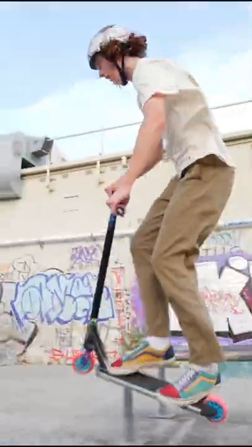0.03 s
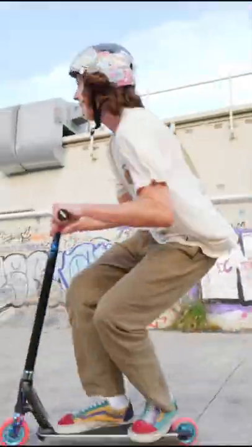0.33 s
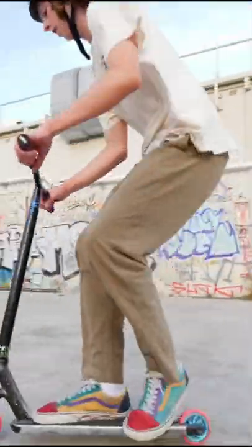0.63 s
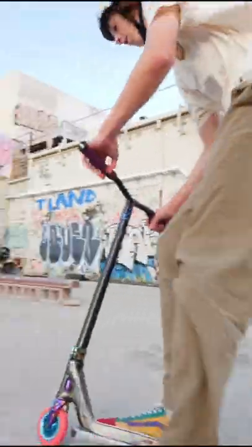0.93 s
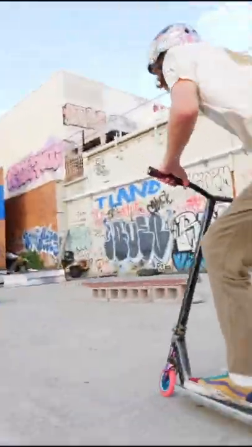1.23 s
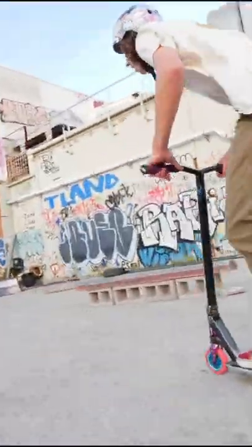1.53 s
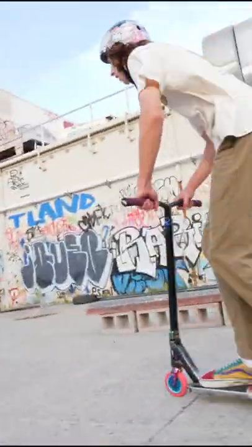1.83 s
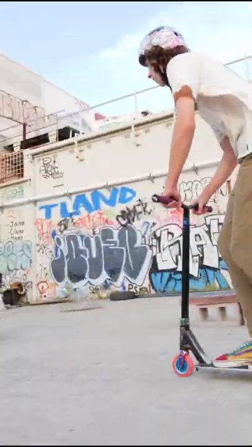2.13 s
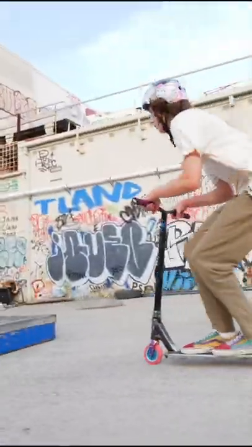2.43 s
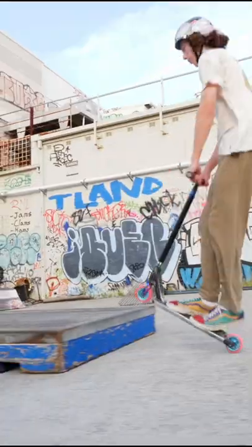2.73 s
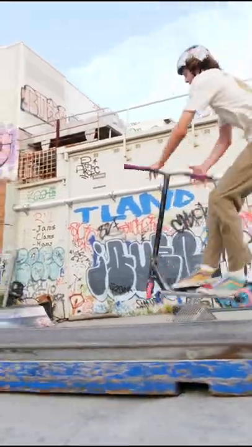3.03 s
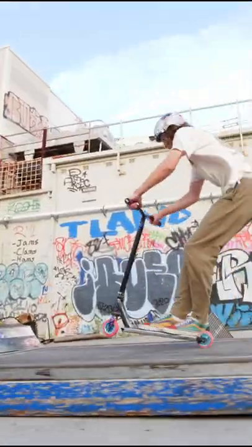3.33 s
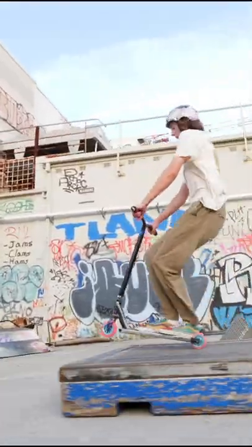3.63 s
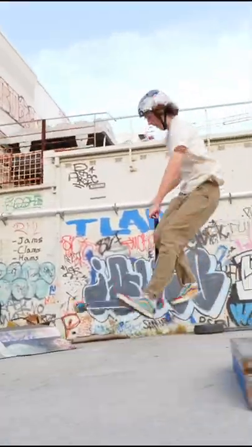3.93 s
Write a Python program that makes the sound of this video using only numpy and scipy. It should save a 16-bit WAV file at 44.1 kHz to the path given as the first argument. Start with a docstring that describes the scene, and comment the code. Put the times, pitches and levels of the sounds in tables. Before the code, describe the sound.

Hard scooter wheels land off a ringing rail and roar by on rough skatepark concrete, loose metal rattling. The scooter then thumps onto a wooden box and scrapes off its edge, while wind rumbles on the close microphone.

```python
"""Skatepark, one moving microphone, air buffeting it throughout and a wall answering the knocks faintly.
A steel rail is ringing as a stunt scooter leaves it and clacks onto concrete at 0.2 s. The hard wheels
roar and whine nearer, pass close by the microphone at about 1.1 s in a hiss of crushed grit, and roll
on over rough ground, loose metal rattling. At 3.1 s the scooter hops onto a hollow wooden box, which
booms and then drums under the wheels; at 3.8 s the deck scrapes off its edge."""
import sys
import numpy as np
from scipy import signal
from scipy.fft import rfft, irfft, next_fast_len
from scipy.io import wavfile
from scipy.ndimage import uniform_filter1d, map_coordinates

SR = 44100
rng = np.random.default_rng(int(sys.argv[2]) if len(sys.argv) > 2 else 0)


def master_out(mix):
    """Clip the mix to full scale and print it as 16-bit PCM to the path in sys.argv[1]."""
    frames = np.transpose(np.atleast_2d(mix))
    ceiling = np.clip(frames, -1, 1)
    pcm = np.round(ceiling * 32767).astype(np.int16)
    wavfile.write(sys.argv[1], SR, pcm)


N = 176400

# decay of the wall's answer: frequency_hz, t60_s
WALL_DECAY = [(150, 0.9), (1500, 0.059), (10000, 0.2)]
# gusts on the microphone: time_s, level_db
WIND_LEVELS = [(0, -17), (.15, -12), (.22, -19), (.38, -26.5), (.58, -23.5), (.74, -29), (.92, -13.5),
               (1.08, -20.5), (1.27, -12.5), (1.53, -7.5), (1.7, -15), (1.91, -8.5), (2.02, -13.5),
               (2.48, -19), (2.69, -10.5), (2.77, -16.5), (2.91, -9), (2.98, -17.5), (3.09, -7.5),
               (3.19, -19), (3.4, -13.5), (4, -16.5)]
# their rumble: frequency_hz, level_db
WIND_COLOUR = [(15, -1), (40, -4), (70, -9), (120, -16.5), (200, -24.5), (350, -36), (700, -72),
               (2000, -103)]
# modes of the steel rail: pitch_hz, level_db, t60_s
RAIL_MODES = [(1290, -49, .6), (1480, -44, .55), (2920, -53, .8), (3665, -47, 1.3), (3722, -31.5, .53),
              (3910, -42, .5), (10350, -53, .55)]
# noisy wash around those modes: frequency_hz, level_db
RAIL_COLOUR = [(500, -1), (1500, -2), (2200, -5.5), (3200, -5), (3950, -3), (4600, -7), (7000, -9),
               (8000, -18), (15000, -35)]
# sand bursting under the wheels: time_s, level_db
SAND_LEVELS = [(.15, -90), (.3, -60), (1.6, -80), (2.25, -78), (2.73, -55), (2.83, -76), (3.45, -66)]
# its crisp top: frequency_hz, level_db
SAND_COLOUR = [(4000, -30), (10500, -14), (12000, 2), (15000, 1), (16000, -11)]
# whine of the approaching wheels: time_s, pitch_hz, level_db
WHEEL_WHINE = [(.2, 2550, -59), (.4, 2720, -51), (.68, 2500, -54), (.83, 2080, -41), (1.0, 1550, -48)]
# hum of the deck passing close: time_s, pitch_hz, level_db
DECK_HUM = [(.62, 590, -52), (.8, 570, -37.5), (1.15, 555, -39), (1.4, 545, -52)]
# wheels on the ground: time_s, roar_db, hiss_db
ROLL_LEVELS = [(.18, -42, -65), (.23, -36.5, -48.5), (.5, -38.5, -51), (.74, -37, -45), (.8, -37.5, -39),
               (1.0, -33, -34), (1.07, -31.5, -40), (1.14, -32, -30.5), (1.24, -31.5, -35),
               (1.35, -35.5, -41.5), (1.5, -36.5, -54), (1.62, -43, -64), (1.85, -38.5, -55.5),
               (2.25, -40.5, -62), (2.68, -30.5, -53), (2.98, -39.5, -58), (3.25, -41, -71),
               (3.45, -38, -51), (3.75, -35.5, -82), (4, -40.5, -53)]
# roar of wheels on concrete: frequency_hz, level_db
ROAR_COLOUR = [(60, -13), (200, 0.5), (400, -0.5), (560, -1), (800, -7), (1100, -10.5), (1700, -12),
               (2600, -21), (4200, -29.5), (7000, -34), (11000, -45), (16000, -56)]
# hiss of grit crushed close by: frequency_hz, level_db
HISS_COLOUR = [(200, -25), (800, -2), (2000, 0.5), (2800, -1), (3900, -0.5), (5000, -3), (7100, -4),
               (8200, -9), (12000, -13.5), (15500, -20.5)]
# resonances of loose metal parts: pitch_hz, width_hz, level_db
METAL_MODES = [(1650, 100, 15), (4810, 110, 0), (5420, 140, -1), (5860, 110, -2), (6210, 110, 0),
               (8600, 400, -5)]
# brightness of their clicks: frequency_hz, level_db
METAL_COLOUR = [(500, -0.5), (1500, 2.5), (4200, 0), (6200, 3), (9500, -3), (11500, -15.5), (15500, -13.5)]
# bouts of one loose part chattering: start_s, level_db, t60_s
JINGLE_BOUTS = [(1.907, -36.5, .24), (2.085, -50, .55), (2.185, -52, .4), (2.312, -51, .3)]
# loose metal and grit snapping: start_s, level_db, t60_s
RATTLE_CLICKS = [(0.188, -23, 0.059), (.316, -33.5, 0.025), (1.1196, -27, 0.028), (1.2144, -20, 0.038),
                 (1.654, -37, 0.036), (2.676, -37, .033), (2.712, -25.5, 0.015), (2.8353, -41, 0.1),
                 (3.069, -40, 0.044), (3.0876, -22, 0.034), (3.4407, -37, 0.046), (3.822, -31, 0.03),
                 (3.865, -35.5, 0.066)]
# modes of the hollow box: pitch_hz, level_db, t60_s
BOX_MODES = [(124, -6, .2), (206, -3, .13), (247, 3.5, .14), (361, -2.5, .22), (400, -3.5, .14),
             (533, -11.5, .158), (709, -12, .15), (1310, -25, .23)]
# blows on the box: start_s, boom_db, clatter_db
BOX_BLOWS = [(3.14, -9, -18), (3.336, -31.5, -39), (3.8248, -19, -53), (3.843, -24, -60)]
# the box drumming under the wheels: time_s, level_db
DRUM_LEVELS = [(3.14, -60), (3.5, -60), (3.7, -41.5), (3.82, -32), (3.92, -87)]
# wood of the box clattering or scraped: frequency_hz, level_db
WOOD_COLOUR = [(200, 17), (700, 6), (1400, -5), (2100, 4), (2700, 0), (3300, -8), (4500, -28), (7000, -39),
               (15000, -55)]
# resonances of the scooter's frame and wheels: pitch_hz, width_hz, level_db
FRAME_MODES = [(264, 190, -2), (413, 145, 6.5), (765, 296, 0), (1115, 262, 3), (1663, 183, 0),
               (2330, 260, -9.5), (3800, 1150, -12.5), (7330, 3000, -20.5)]
# wheel blows: start_s, peak_db, hardness_hz, chatter_t60_s
WHEEL_BLOWS = [(.1904, 2, 5000, .02), (.1925, -10, 500, .03), (.1988, -9.5, 1000, .014),
               (.2162, -19, 4900, .03), (.2463, -20, 300, .037), (1.0235, -10, 1200, .012),
               (1.029, -6.5, 600, .029), (1.035, -5.5, 1000, .025), (1.209, -13, 4000, .054),
               (1.2162, -6.5, 8000, .045), (1.6547, -19.5, 8000, .08), (1.699, -28, 9000, .025),
               (2.047, -26, 1500, .07), (2.667, -22, 1000, .12), (3.1393, -8, 2000, .07),
               (3.166, -19, 1800, .06), (3.8095, -11, 3000, .06), (3.8165, -8, 1400, .05)]


def amp(db):
    """Decibels to gain."""
    return 10 ** (np.asarray(db) / 20)


def unit(x):
    """Scale to rms 1."""
    return x / np.sqrt(np.mean(x ** 2) + 1e-20)


def along(points, hz):
    """Interpolate (frequency_hz, value) rows on a log frequency axis."""
    knots_hz, values = np.transpose(points)
    return np.interp(np.log(hz + 1), np.log(knots_hz + 1), values)


def curves(rows, **ends):
    """One value per sample for each column after time_s."""
    time_s, *columns = np.transpose(rows)
    return [np.interp(np.arange(N) / SR, time_s, column, **ends) for column in columns]


def wobble(per_s):
    """A smooth random curve with per_s knots a second."""
    return map_coordinates(rng.standard_normal(4000), [np.arange(N) * per_s / SR], mode='wrap')


def filtered(x, response):
    """Pass x through a complex response, given as a function of frequency."""
    size = next_fast_len(len(x) + 8192)
    return irfft(rfft(x, size) * response(np.fft.rfftfreq(size, 1 / SR)), size)[:len(x)]


def coloured(x, colour):
    """Shape x by (frequency_hz, level_db) rows, at rms 1."""
    return unit(filtered(x, lambda f: amp(along(colour, f))))


def resonances(modes, f):
    """Summed response of (pitch_hz, width_hz, level_db) modes."""
    return sum(amp(db) * 1j * f * width / (hz * hz - f * f + 1j * f * width) for hz, width, db in modes)


def patchy_noise(depth_db):
    """Noise whose gain varies in random patches of time and frequency."""
    spectra = signal.stft(rng.standard_normal(N), nperseg=512)[2]
    patches = uniform_filter1d(rng.standard_normal(spectra.shape), size=5, axis=0)
    patches = unit(uniform_filter1d(patches, size=10, axis=1))
    return unit(signal.istft(spectra * amp(depth_db * patches), nperseg=512)[1][:N])


def grains(per_s, spread_db):
    """Random impulses, a few much larger than the rest."""
    sizes = amp(spread_db * np.minimum(rng.exponential(size=N), 4))
    return unit((rng.random(N) < per_s / SR) * sizes * rng.choice([-1, 1], N))


def snaps(per_s, spread_db, t60_s=0.015):
    """Scattered grains, each a tiny fading burst of noise."""
    t = np.arange(SR // 30) / SR
    envelope = signal.fftconvolve(np.abs(grains(per_s, spread_db)), amp(-60 * t / t60_s))[:N]
    return envelope * rng.standard_normal(N)


def fuzzy_tone(track, width_hz):
    """A narrow band of noise that follows (time_s, pitch_hz, level_db) rows."""
    hz, level_db = curves(track, left=-120, right=-120)
    phase = 2 * np.pi * np.cumsum(hz) / SR
    return amp(level_db) * (wobble(2 * width_hz) * np.sin(phase) + wobble(2 * width_hz) * np.cos(phase))


def metallic(x):
    """Give x the ring and bright colour of small metal parts."""
    return coloured(x + filtered(x, lambda f: resonances(METAL_MODES, f)), METAL_COLOUR)


def add(track, start_s, sound):
    """Mix a sound into the track at start_s."""
    part = track[max(round(start_s * SR), 0):][:len(sound)]
    part += sound[:len(part)]


def wall(x):
    """The skatepark wall answers 10 ms late with a tail whose lows linger longest."""
    hz, t, spectra = signal.stft(rng.standard_normal(SR // 2), SR, nperseg=256)
    decay = amp(-60 * t / along(WALL_DECAY, hz)[:, None])
    tail = signal.istft(spectra * decay, SR, nperseg=256)[1]
    return signal.fftconvolve(x, np.pad(tail / np.linalg.norm(tail), (SR // 100, 0)))[:N]


def wind():
    """Air buffets the moving microphone in low, uneven lumps."""
    level_db, = curves(WIND_LEVELS)
    rumble = coloured(rng.standard_normal(N), WIND_COLOUR)
    return amp(level_db) * unit(rumble * amp(1.16 * wobble(16)))


def rail(wash_db=-36.5, wash_t60_s=.5):
    """The steel rail rings out roughly, each mode fluttering in level and phase."""
    t = np.arange(N) / SR
    ring = np.zeros(N)
    for hz, db, t60 in RAIL_MODES:
        envelope = amp(db - 60 * t / t60 + 1.5 * wobble(150))
        ring += envelope * np.sin(2 * np.pi * hz * t + .65 * wobble(110))
    return ring + amp(wash_db - 60 * t / wash_t60_s) * coloured(rng.standard_normal(N), RAIL_COLOUR)


def sand():
    """Sand grains burst under the wheels in crisp, very high snaps."""
    level_db, = curves(SAND_LEVELS)
    return amp(level_db) * coloured(snaps(per_s=65, spread_db=3), SAND_COLOUR)


def whine_and_hum():
    """The wheels' whine sinks as they near the microphone; the deck hums as it passes close."""
    return fuzzy_tone(WHEEL_WHINE, width_hz=170) + fuzzy_tone(DECK_HUM, width_hz=28)


def rolling(grit_db=-2.5, tick_db=-21.5, tick_low_cut_hz=4500):
    """Hard wheels roar on concrete and flick loose grains; close to the microphone, crushed grit hisses."""
    roar_db, hiss_db = curves(ROLL_LEVELS)
    bumps = amp(0.92 * wobble(70) + 0.54 * wobble(11.15))
    roar = coloured(patchy_noise(depth_db=3) + 0.4 * grains(per_s=900, spread_db=6), ROAR_COLOUR)
    grit = patchy_noise(depth_db=2) + amp(grit_db) * grains(per_s=2300, spread_db=7.5)
    hiss = coloured(grit, HISS_COLOUR)
    flicks = metallic(snaps(per_s=53, spread_db=2))
    ticks = unit(filtered(flicks, lambda f: f * f / (f * f + tick_low_cut_hz ** 2)))
    scuffs_db = 1.5 * wobble(45)
    return bumps * (amp(roar_db) * (roar + amp(tick_db) * ticks) + amp(hiss_db + scuffs_db) * hiss)


def jingles(tap_gap_s=.012, tap_t60_s=.025):
    """A loose metal part on the scooter chatters in quick, fading taps."""
    out, t = np.zeros(N), np.arange(SR // 4) / SR
    for start_s, db, t60 in JINGLE_BOUTS:
        since_tap = t % (tap_gap_s * amp(rng.normal()))  # each bout has its own pace
        force = rng.standard_normal(len(t)) * amp(-60 * since_tap / tap_t60_s)
        ring = unit(filtered(force, lambda f: resonances(METAL_MODES, f)))
        add(out, start_s, amp(db - 60 * t / t60) * ring)
    return out


def rattles(attack_s=0.0002):
    """Loose metal and grit snap in short, bright clicks."""
    out, t = np.zeros(N), np.arange(SR // 5) / SR
    for start_s, db, t60 in RATTLE_CLICKS:
        envelope = amp(db - 60 * t / t60) * (1 - np.exp(-t / attack_s))
        add(out, start_s, envelope * metallic(rng.standard_normal(len(t))))
    return out


def box_drumming(width_hz=40):
    """Wheels crossing the hollow box keep its modes drumming."""
    level_db, = curves(DRUM_LEVELS, left=-120, right=-120)
    modes = [(hz, width_hz, db) for hz, db, _ in BOX_MODES]
    return amp(level_db) * unit(filtered(rng.standard_normal(N), lambda f: resonances(modes, f)))


def box_thumps(push_hz=366, push_db=13, push_t60_s=0.015, attack_s=0.0015, clatter_t60_s=.17):
    """Under each blow the lid gives with a short push, the hollow box booms and the lid clatters."""
    out, t = np.zeros(N), np.arange(SR // 2) / SR
    push = amp(push_db - 60 * t / push_t60_s) * np.sin(2 * np.pi * push_hz * t)
    for start_s, boom_db, clatter_db in BOX_BLOWS:
        ring = np.zeros(len(t))
        for hz, db, t60 in BOX_MODES:
            envelope = amp(db + rng.normal(0, 1) - 60 * t / t60)
            ring += envelope * np.sin(2 * np.pi * (hz * t + rng.random()))
        boom = amp(boom_db) * (push + ring * (1 - np.exp(-t / attack_s)))
        judder = amp(3 * wobble(300))
        clatter = coloured((rng.standard_normal(N) * judder)[:len(t)], WOOD_COLOUR)
        add(out, start_s, boom + amp(clatter_db - 60 * t / clatter_t60_s) * clatter)
    return out


def scrape(free_s=3.816, top_db=-20, rise_db_per_s=150, fall_db_per_s=900):
    """The deck drags ever harder over the edge of the box, then comes free."""
    t = np.arange(N) / SR - free_s
    level_db = top_db + np.minimum(rise_db_per_s * t, -fall_db_per_s * t)
    friction = rng.standard_normal(N) + grains(per_s=960, spread_db=3.5)
    return amp(level_db) * coloured(friction, WOOD_COLOUR)


def frame_response(f):
    """The scooter's frame, whose neighbouring modes swing opposite ways."""
    return resonances(FRAME_MODES[::2], f) - resonances(FRAME_MODES[1::2], f)


def clacks(chatter_db=-22.5):
    """Each wheel blow sends a push and a short chatter through the frame; soft ones are duller."""
    out, t = np.zeros(N), np.arange(SR // 5) / SR
    push = t == 0
    for start_s, peak_db, hardness_hz, t60 in WHEEL_BLOWS:
        chatter = rng.standard_normal(len(t)) * amp(chatter_db - 60 * t / t60)
        hit = filtered(push + chatter, lambda f: frame_response(f) / (1 + 1j * f / hardness_hz))
        add(out, start_s, amp(peak_db) * hit / np.abs(hit).max())
    return out


def scene(wall_db=-23.5):
    """All sources at the microphone, in mono; the wall answers only the knocks, rattles and box."""
    hits = clacks() + rattles() + jingles() + box_thumps() + box_drumming() + scrape()
    answer = amp(wall_db) * wall(hits)
    return (hits + answer + rolling() + sand() + whine_and_hum() + rail() + wind())[None]


def record(dry, top_hz=15830):
    """The recorder rounds off the highest peaks and keeps nothing above its band limit."""
    rounded = dry[0] / (1 + np.abs(dry[0]) ** 8) ** (1 / 8)
    return filtered(rounded, lambda hz: hz < top_hz)[None]


dry = scene()
out = record(dry)
master_out(out)
```